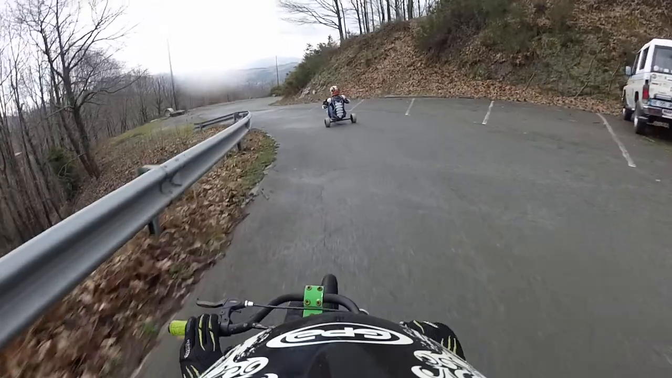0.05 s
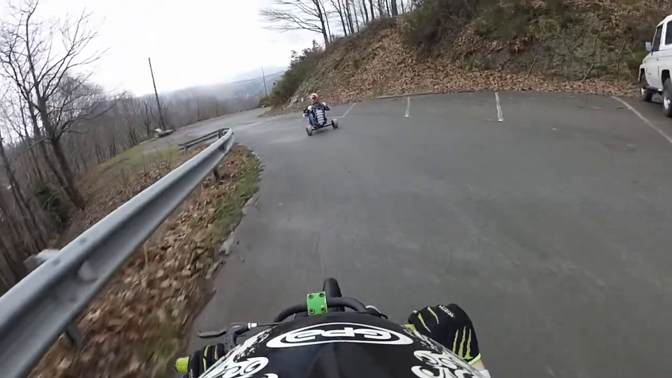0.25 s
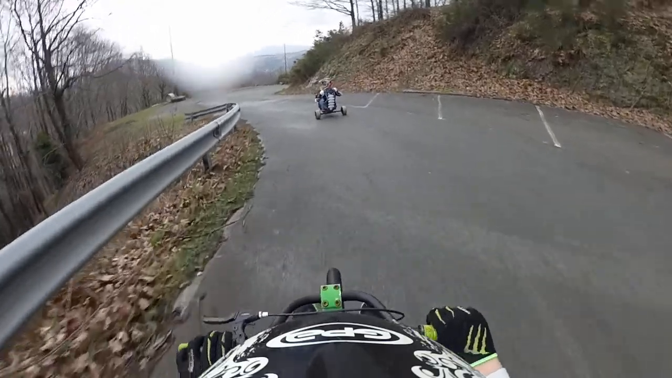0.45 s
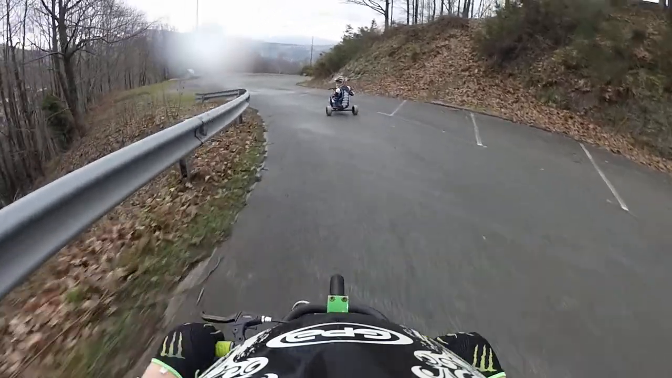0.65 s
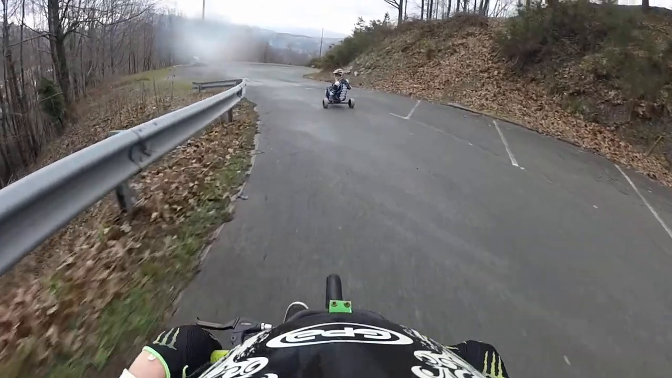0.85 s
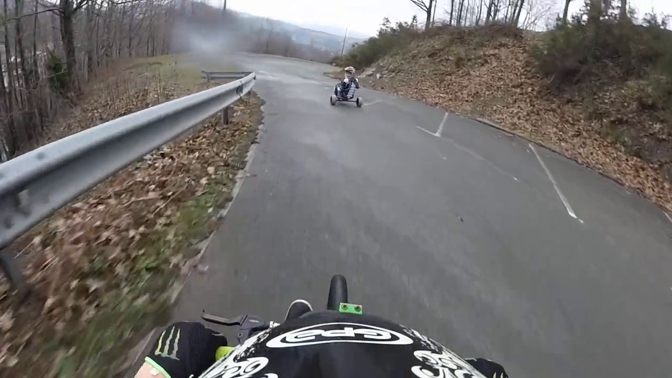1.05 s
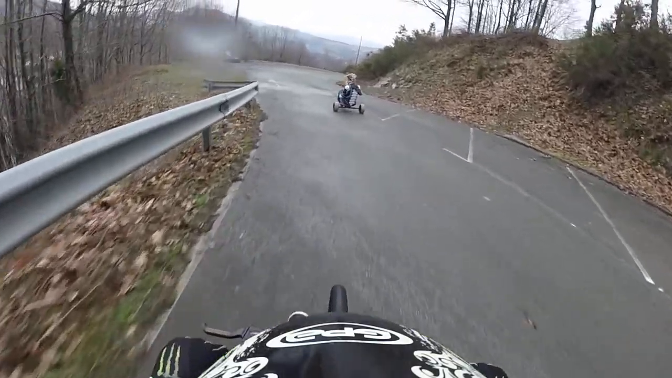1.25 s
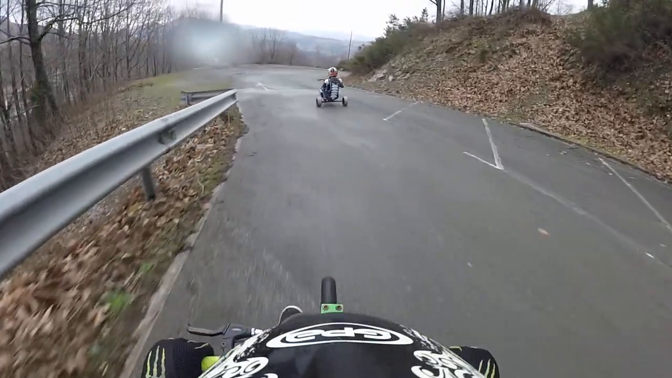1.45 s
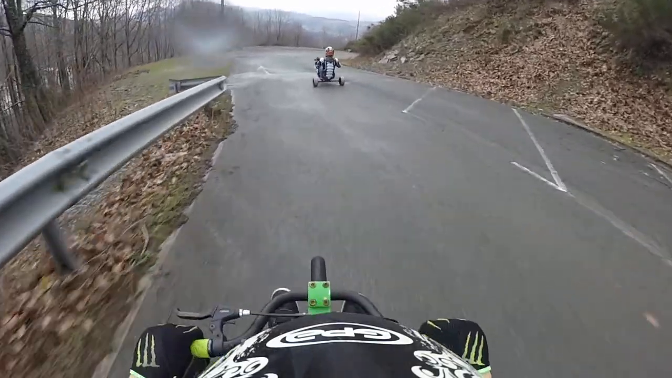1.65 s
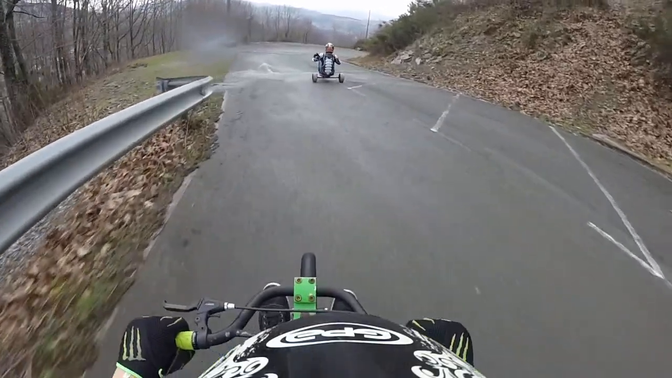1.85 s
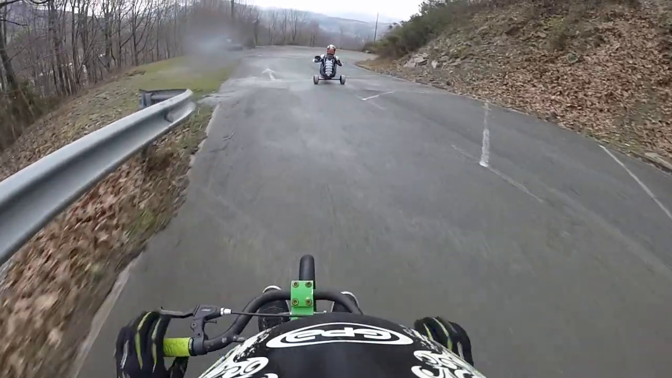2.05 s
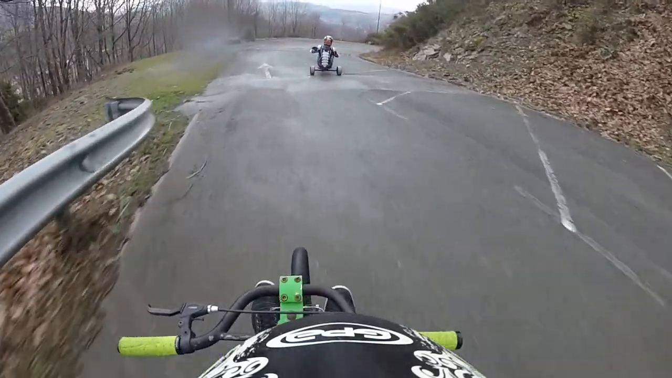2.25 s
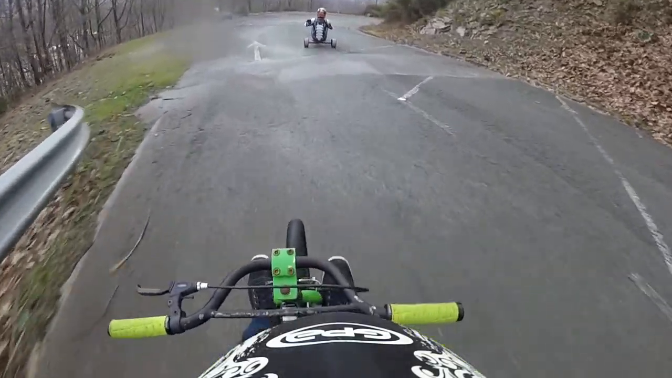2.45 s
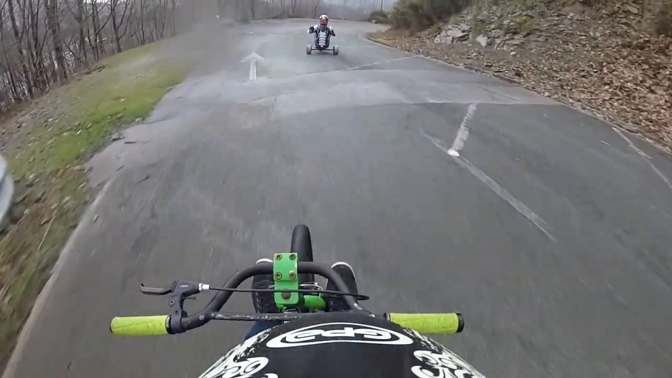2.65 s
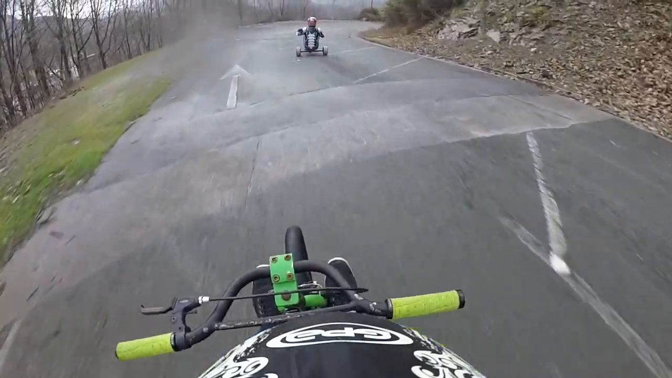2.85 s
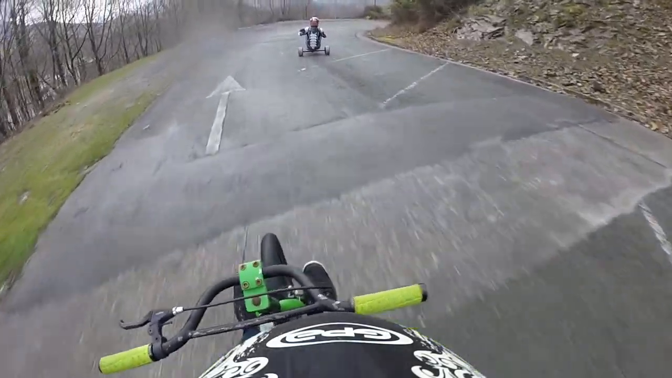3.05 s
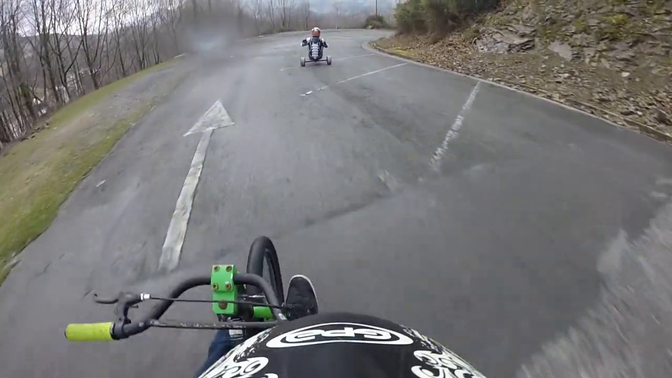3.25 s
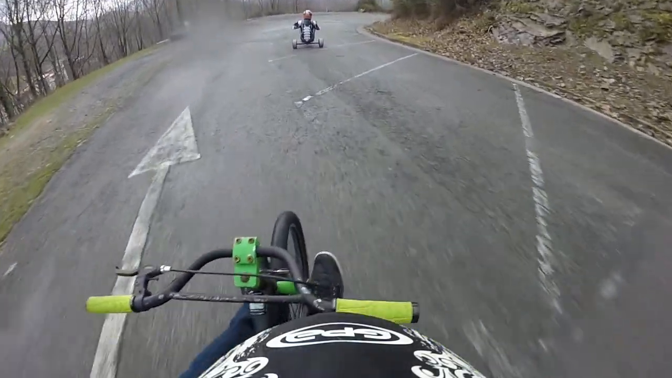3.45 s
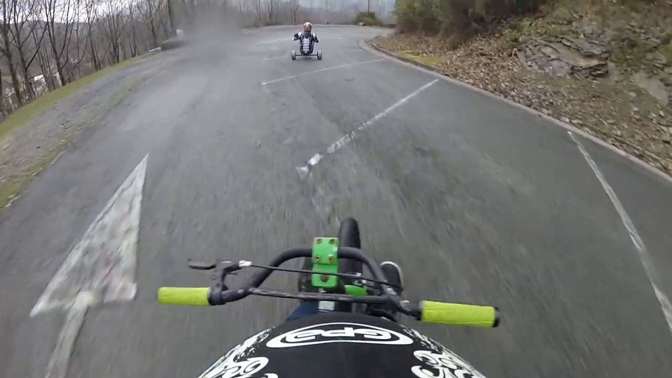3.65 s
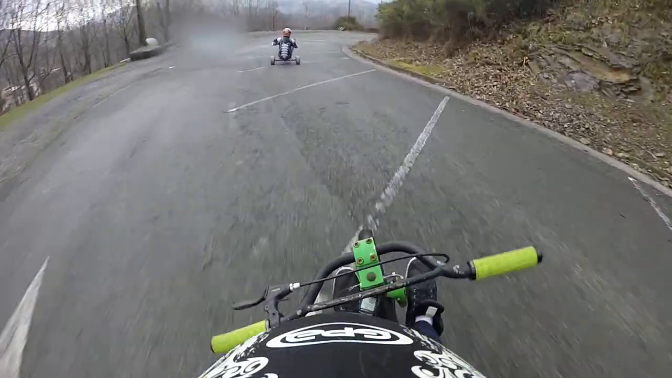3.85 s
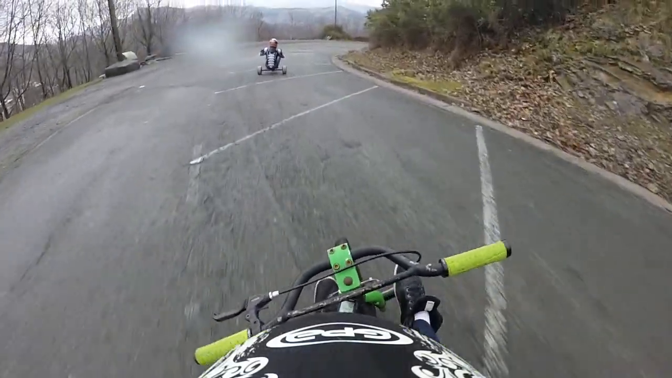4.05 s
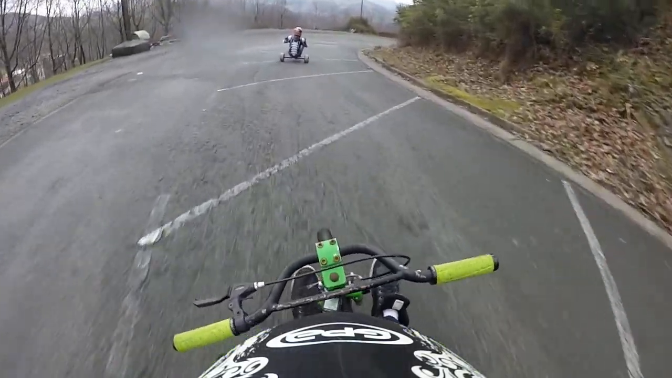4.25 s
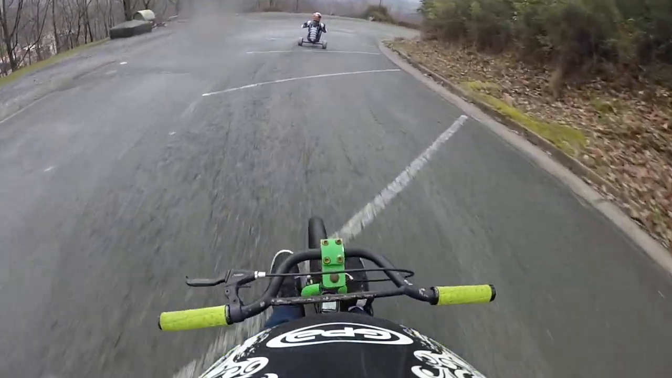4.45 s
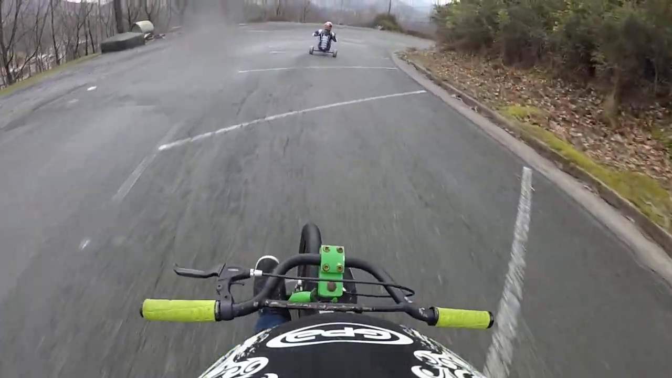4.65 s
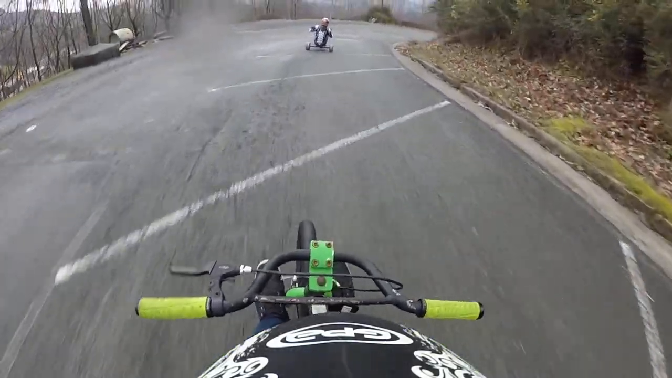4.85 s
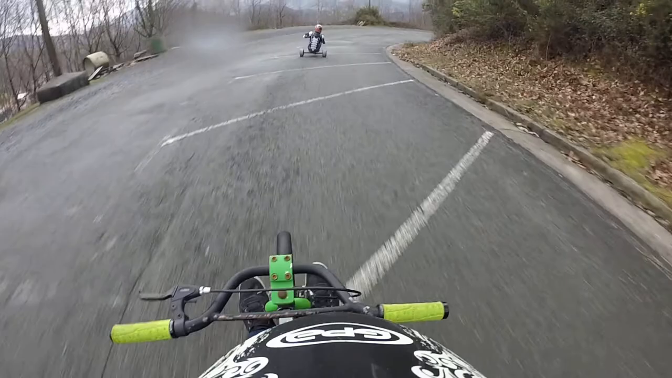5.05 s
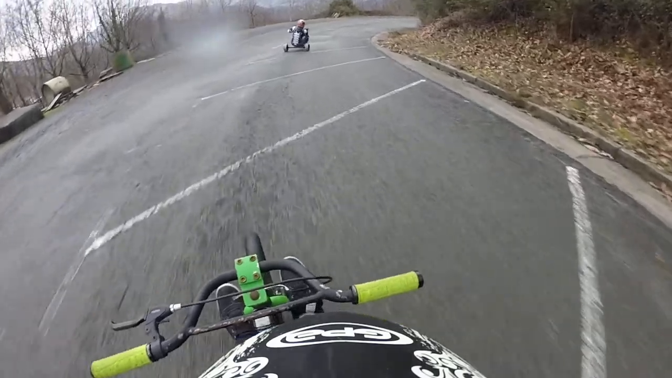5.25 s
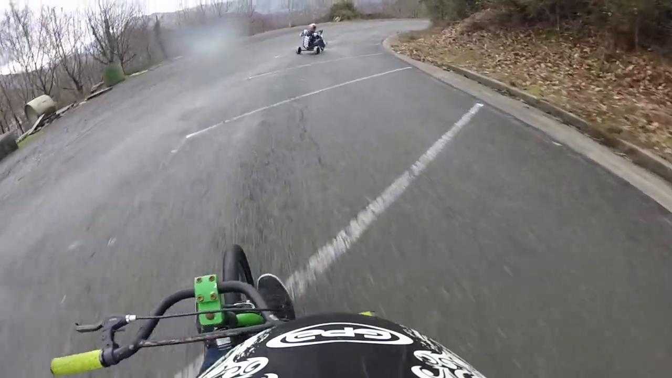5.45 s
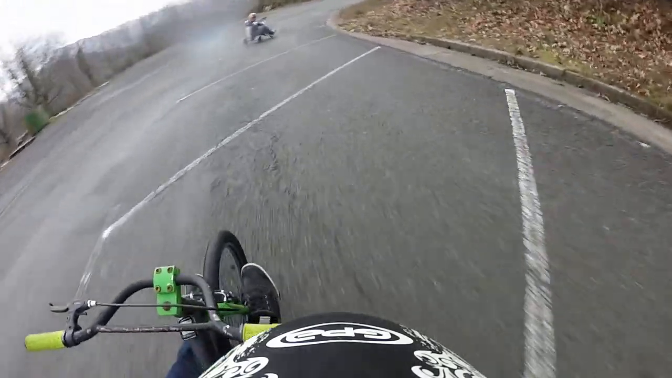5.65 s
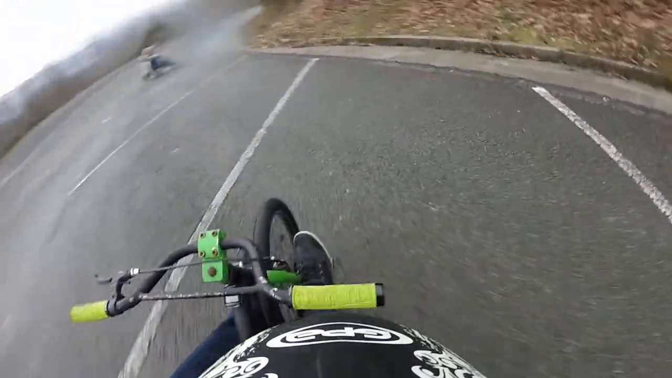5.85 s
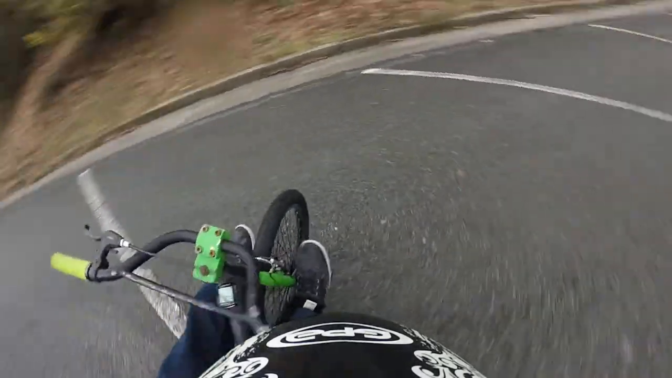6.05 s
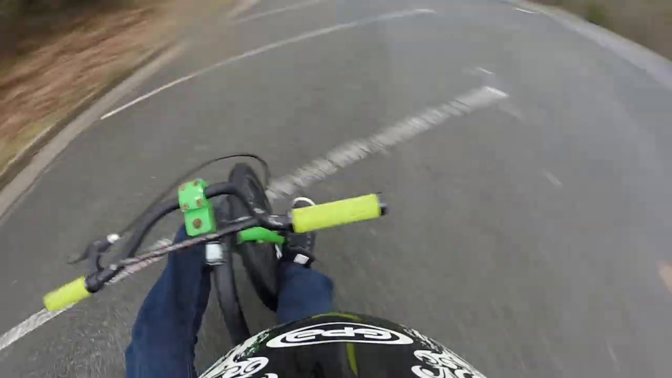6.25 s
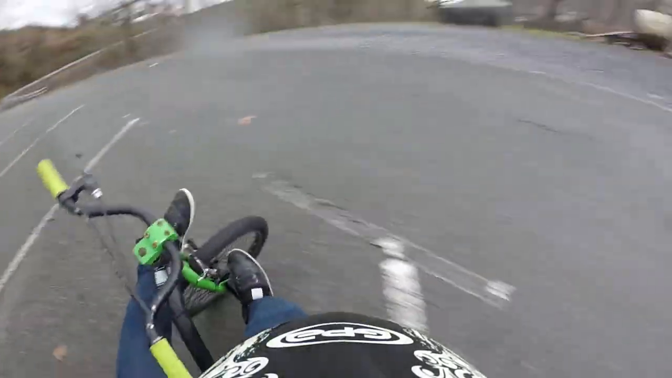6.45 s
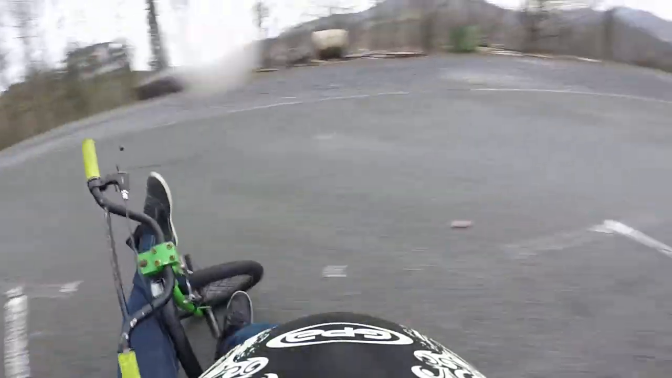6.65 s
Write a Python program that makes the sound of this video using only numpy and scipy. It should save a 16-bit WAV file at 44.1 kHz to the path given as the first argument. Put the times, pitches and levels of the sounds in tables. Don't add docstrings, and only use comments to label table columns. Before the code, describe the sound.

Close, enclosed, muffled-cased pickup on a rider's helmet: hard plastic grinding on asphalt, low drumming from the frame and soft wind buffeting. Small sharp ticks of grit and short ringing stone hits scatter throughout. A cluster of heavy thumps comes midway over rough road, and near the end the slide swells into a loud gritty scrape with sizzling dust and more thuds.

```python
import sys
import numpy as np
from scipy import signal
from scipy.fft import rfft, irfft, next_fast_len
from scipy.io import wavfile
from scipy.ndimage import uniform_filter1d, map_coordinates

SR = 44100
rng = np.random.default_rng(int(sys.argv[2]) if len(sys.argv) > 2 else 0)


def natural_amplitude(level_db):
    exponent = np.asarray(level_db, float) / 20
    return 10 ** exponent


def bounce(signal):
    frames = np.transpose(np.atleast_2d(signal))
    limited = np.clip(frames, -1, 1)
    pcm = np.round(limited * 32767).astype(np.int16)
    wavfile.write(sys.argv[1], SR, pcm)


N = 295470


def unit(x):
    return x / np.sqrt(np.mean(x ** 2) + 1e-20)


def curves(rows):
    s, *columns = np.transpose(rows)
    return [np.interp(np.arange(N) / SR, s, column) for column in columns]


def wobble(rate_hz):
    knots = rng.standard_normal(int(N * rate_hz / SR) + 4)
    return map_coordinates(knots, [np.arange(N) * rate_hz / SR])


def filtered(x, response):
    m = next_fast_len(N + SR // 2)
    return irfft(rfft(x, m) * response(np.fft.rfftfreq(m, 1 / SR)), m)[:N]


def coloured(x, points):
    last_hz, last_db = points[-1]
    f, db = np.transpose(points + [(2 * last_hz, last_db - 40)])
    return filtered(x, lambda hz: natural_amplitude(np.interp(np.log(hz + 1), np.log(f), db)))


def resonant(x, modes):
    def response(f):
        total = 0
        for k, (centre, width, db) in enumerate(modes):
            damping = 1j * f * width
            total = total + (-1) ** k * natural_amplitude(db) * damping / (centre * centre - f * f + damping)
        return total
    return filtered(x, response)


def grains(rate_hz, spread_db, smooth):
    struck = rng.random(N) < rate_hz / SR
    hardness_db = spread_db * np.minimum(rng.exponential(size=N), 3)
    size = natural_amplitude(hardness_db) * rng.standard_normal(N)
    return unit(struck * size) + smooth * rng.standard_normal(N)


def patchy(x, depth_db, bins, frames):
    z = signal.stft(x, nperseg=256)[2]
    field = uniform_filter1d(rng.standard_normal(z.shape), bins, 0)
    field = uniform_filter1d(field, frames, 1)
    return unit(signal.istft(z * natural_amplitude(depth_db * unit(field)), nperseg=256)[1][:N])


def bursts(s, ms, db):
    t = np.arange(SR // 20) / SR
    life = t / np.maximum(ms, 0.5)[:, None] * 1000
    rattle = natural_amplitude(-13 - 60 * t / 0.075)
    shape = (np.exp(-0.8 * life ** 2) + rattle) * (1 - np.exp(-t / 0.00024))
    at = np.round(s * SR).astype(int)[:, None] + np.arange(len(t))
    return np.bincount(at.ravel(), (natural_amplitude(db)[:, None] * shape).ravel(), N + SR)[:N]


def ringing(rows, rise_s, rough):
    out, t = np.zeros(N + SR), np.arange(SR // 4) / SR
    swell = (1 - np.exp(-t / rise_s)) ** 2
    for s, db, hz, t60_s in rows:
        decay = natural_amplitude(db - 60 * t / max(t60_s, 0.005))
        out[round(s * SR):][:len(t)] += decay * swell * np.sin(2 * np.pi * hz * t)
    return out[:N] * (1 + rough * wobble(1500))


# centre in Hz, width in Hz, level in dB.
CASE_MODES = [(1770, 163, -5), (2415, 197, -4.5), (3096, 260, -9.5), (3638, 288, -13), (4640, 756, -13),
              (6110, 777, -17.5), (7200, 286, -26.5), (10010, 880, -28.5), (11100, 4900, -36)]


def airborne(envelope, source, points):
    steady = np.std(resonant(coloured(source, points), CASE_MODES))
    return resonant(coloured(envelope * source, points), CASE_MODES) / steady


# time in seconds, load on the sleeves in dB, sideways scrape in dB.
ROLLING = [
    (0.0, -48, -68),
    (0.4, -47, -68),
    (0.97, -42, -69),
    (2.07, -41.5, -68),
    (2.22, -39.5, -67),
    (3.29, -39, -64.5),
    (4.03, -38, -60),
    (4.34, -36.5, -66),
    (4.95, -36, -63),
    (5.55, -38.5, -63),
]
# time in seconds, load on the sleeves in dB, sideways scrape in dB.
SLIDING = [
    (5.62, -36.5, -62.5),
    (5.85, -32.5, -56),
    (6.05, -29.5, -49),
    (6.146, -27.5, -43),
    (6.27, -32, -52),
    (6.386, -35.5, -58.5),
    (6.452, -35, -53),
    (6.7, -33, -50.5),
]
# frequency in Hz, level in dB per Hz.
DRONE_SPECTRUM = [(700, -6), (1250, -5), (1450, 3.5), (1660, 8.5), (1850, 5), (2000, -1), (2600, -34)]
# frequency in Hz, level in dB per Hz.
GRIND_SPECTRUM = [(1000, -42), (1900, -15), (2200, 0.5), (3300, -2), (4200, -7.5), (6000, -37)]
# frequency in Hz, level in dB per Hz.
HISS_SPECTRUM = [(2500, -14.5), (3600, -4), (4800, -3.5), (6300, -3.5), (6900, -18), (9000, -33)]
# frequency in Hz, level in dB per Hz.
FIZZ_SPECTRUM = [(6500, -24), (8000, 3.5), (9000, -1), (12000, -5), (14000, -12), (15300, -13)]


def wheels():
    drone_db, fizz_db = curves(ROLLING + SLIDING)
    load_db, scrape_db = drone_db + 38, fizz_db + 68
    grind_db = -43 + 0.43 * load_db + 0.4 * scrape_db
    hiss_db = -49.5 + 0.31 * load_db + 0.61 * scrape_db
    sliding = np.arange(N) / SR > SLIDING[0][0]
    lift_db = np.where(sliding, -0.5, 2.0)
    lumpy = np.where(sliding, 0.3, 1.0)
    flutter = lumpy * (wobble(12) + 0.4 * wobble(40))
    coarse = patchy(grains(4000, spread_db=1.5, smooth=1.0), depth_db=1.5, bins=3, frames=12)
    fine = patchy(grains(2500, spread_db=2.0, smooth=1.0), depth_db=2.5, bins=10, frames=5)
    drone_db = drone_db + lift_db + 0.3 * flutter + 0.38 * wobble(28)
    grind_db = grind_db + lift_db + 0.33 * flutter + 0.74 * wobble(30)
    hiss_db = hiss_db + lift_db - 4 + 0.38 * flutter + 0.22 * wobble(30)
    fizz_db = fizz_db + lift_db + 0.5 + 1.1 * flutter + lumpy * wobble(23)
    low = airborne(natural_amplitude(drone_db), coarse, DRONE_SPECTRUM) + airborne(natural_amplitude(grind_db), coarse, GRIND_SPECTRUM)
    high = airborne(natural_amplitude(hiss_db), fine, HISS_SPECTRUM) + airborne(natural_amplitude(fizz_db), fine, FIZZ_SPECTRUM)
    return low + high


# time in seconds, drumming in dB.
ROUGHNESS = [(0.0, -37.5), (0.49, -38.5), (1.1, -39), (1.46, -39.5), (2.4, -35.5), (3.0, -37), (3.49, -31),
             (3.75, -38), (4.25, -36), (4.64, -40.5), (5.9, -36), (6.2, -31.5), (6.7, -29.5)]
# frequency in Hz, level in dB per Hz.
FRAME_SPECTRUM = [(29, -33), (50, -6.5), (91, 1), (108, 0), (149, -5), (205, -21), (230, -27), (300, -27.5),
                  (510, -120)]
# centre in Hz, width in Hz, level in dB.
MOUNT_MODES = [(237.4, 17.2, 1.5), (339.4, 46, -1.5), (492, 223, -6.5), (714.5, 54, 1.5), (1050, 630, -9)]
# time in seconds, peak in dB.
MOUNT_JARS = [(3.248, -33), (3.299, -29), (3.332, -25), (3.363, -26), (3.391, -25), (3.433, -23.5),
              (3.534, -21), (3.555, -32), (3.589, -26), (4.27, -36), (4.306, -28), (4.336, -28),
              (4.52, -36), (4.57, -34), (5.7, -35), (5.829, -28), (5.88, -50), (6.13, -38), (6.451, -31),
              (6.49, -37), (6.68, -42)]
# time in seconds, peak in dB, frequency in Hz, t60 in seconds.
SEAMS = [(1.809, -19, 87, 0.086), (2.301, -25, 116, 0.12), (2.513, -16.5, 71, 0.096),
         (3.159, -21.5, 86, 0.12), (3.306, -16.5, 101, 0.082), (3.34, -18, 104, 0.058),
         (3.377, -21, 97.5, 0.062), (3.398, -9, 99, 0.042), (3.432, -11, 97, 0.057),
         (3.533, -14, 99, 0.081), (3.563, -20, 100, 0.072), (3.591, -22.5, 105.5, 0.15),
         (5.696, -18.5, 116, 0.094), (6.127, -18, 100, 0.11), (6.305, -27, 78.5, 0.058),
         (6.451, -7.5, 106, 0.095), (6.499, -15, 95, 0.064), (6.579, -21, 111, 0.086),
         (6.678, -6.5, 102, 0.033)]
# time in seconds, peak in dB, frequency in Hz.
SMALL_RIDGES = [(0.017, -26.5, 95), (0.255, -28, 105), (0.304, -32, 100), (0.407, -24, 103),
                (0.525, -29, 80.7), (0.587, -34, 113), (0.872, -29, 80.7), (1.188, -25.5, 95),
                (1.689, -26.5, 118), (2.059, -23, 70.0), (2.27, -26, 102), (2.324, -21.5, 133),
                (2.43, -25, 99), (2.692, -23, 113), (2.818, -26, 62.4), (2.859, -21.5, 101),
                (2.905, -24, 91.5), (2.947, -19, 93), (3.255, -18.5, 92), (3.823, -25, 91.5),
                (3.919, -24, 105), (3.994, -24, 97), (4.086, -28, 107), (4.278, -27, 117),
                (4.304, -25.5, 122), (4.339, -30, 118), (4.373, -23, 96.9), (4.521, -23.5, 77.6),
                (4.582, -26, 136), (4.692, -27, 94.2), (4.909, -24, 96.9), (5.084, -27, 88.8),
                (5.249, -23, 98), (5.405, -24, 88.8), (5.514, -42, 83.4), (5.62, -20, 83),
                (5.785, -19, 103), (5.83, -21, 119), (5.901, -32, 105), (6.034, -19, 104),
                (6.408, -16.5, 96), (6.605, -27, 83.4), (6.639, -25, 96.9)]


def frame():
    drum_db, = curves(ROUGHNESS)
    jolts_db = 2.6 * wobble(25)
    drum = unit(natural_amplitude(jolts_db) * coloured(rng.standard_normal(N), FRAME_SPECTRUM))
    jar_s, jar_db = np.transpose(MOUNT_JARS)
    thud = bursts(jar_s, np.full(len(jar_s), 30.0), jar_db - 19)
    shake_db = -54 + 0.9645 * np.arange(N) / SR + 0.074 * (drum_db + 38)
    shaking = natural_amplitude(shake_db + 2.5 + 0.37 * jolts_db)
    shaking = shaking + bursts(jar_s, np.full(len(jar_s), 16.0), jar_db - 17)
    road = coloured(grains(800, spread_db=-0.5, smooth=1.55), [(100, 0), (3000, 0)])
    shake = resonant(shaking * road, MOUNT_MODES) / np.std(resonant(road, MOUNT_MODES))
    ridges = [(s, db - 1.5, hz, 0.1) for s, db, hz in SMALL_RIDGES]
    thumps = natural_amplitude(5.5) * ringing(SEAMS + ridges, rise_s=0.0048, rough=0.012)
    return (natural_amplitude(drum_db + 1.52) + thud) * drum + shake - thumps


# time in seconds, level in dB.
HEAD_WIND = [
    (0.0, -57),
    (0.07, -42),
    (1.53, -45),
    (2.5, -36),
    (3.17, -44),
    (3.28, -38),
    (3.97, -50),
    (5.3, -40),
    (6.66, -28.5),
    (6.7, -36),
]
# frequency in Hz, level in dB per Hz.
GUST_SPECTRUM = [(10, -23), (25, 6), (45, -4.5), (60, 1), (90, -35), (150, -75)]


def wind():
    buffets = natural_amplitude(4.3 * wobble(4.11)) * coloured(rng.standard_normal(N), GUST_SPECTRUM)
    return natural_amplitude(curves(HEAD_WIND)[0]) * unit(buffets)


# time in seconds, level in dB.
DAMP_DUST = [(0.0, -66), (0.47, -63), (0.97, -58), (1.1, -61), (1.57, -58.5), (1.75, -61.5), (3.0, -65.5),
             (4.01, -53.5), (4.42, -66), (4.76, -61), (5.26, -71), (5.8, -58), (6.08, -46), (6.44, -50),
             (6.7, -41.5)]
# frequency in Hz, level in dB per Hz.
DUST_SPECTRUM = [(5800, -20), (6700, -6), (7600, -4), (8300, -26)]


def spray():
    level_db = curves(DAMP_DUST)[0] + 6 + 2.5 * wobble(30)
    return airborne(natural_amplitude(level_db), grains(2000, spread_db=4.0, smooth=0.87), DUST_SPECTRUM)


# time in seconds, crack in dB, bright edge over it in dB, length in ms.
GUARD_RAIL_TICKS = [(0.0514, -30, -39, 2.8), (0.062, -23.5, -36, 2.7), (0.2079, -38, -13, 3.5),
                    (0.384, -35, -19, 3.5), (0.5079, -28, -41, 2.2), (0.574, -33, -19, 3.2),
                    (0.639, -29, -27, 3.2), (0.6746, -32, -23, 3.5), (0.724, -29, -21, 3.9),
                    (0.766, -25, -22, 5.2), (0.8007, -27, -33, 3.1), (0.8154, -35, -27, 3.5),
                    (0.8317, -26, -23, 3.1), (0.872, -33, -24, 3.5), (0.8867, -34, -13, 3.1),
                    (0.9118, -35, -15, 4.5), (0.971, -30, -31, 2.9), (0.9946, -32, -27, 3.5),
                    (1.009, -26.5, -25, 2.7), (1.035, -31, -15, 3.9), (1.0894, -33.5, -16, 4.8),
                    (1.13, -33, -22, 2.9), (1.1524, -23, -19, 6), (1.255, -39, -13, 3.5),
                    (1.273, -32.5, -6.5, 2.9), (1.344, -27.5, -20, 2.6), (1.352, -33.5, -12, 3.5),
                    (1.5068, -31.5, -13, 6.2), (1.5224, -27, -25, 3.2), (1.538, -30, -16, 3.9)]
# time in seconds, crack in dB, bright edge over it in dB, length in ms.
PATCHED_ROAD_TICKS = [(1.562, -31.5, -19, 5.5), (1.677, -28.5, -23, 5), (2.098, -32, -20, 5.1),
                      (2.1311, -35, -20, 4.5), (2.182, -38, -29, 4.5), (2.2005, -28.5, -23, 10),
                      (2.2982, -35, -12, 5), (2.322, -33, -20, 5.4), (2.352, -33.5, -17, 5.9),
                      (2.4466, -28, -19, 3.1), (2.5995, -39, -6, 4.5), (2.6673, -29.5, -12, 3.4),
                      (2.7182, -36, -20, 4.5), (2.7901, -35, -24, 4.5), (2.8544, -26, -18, 4),
                      (2.8664, -27.5, -18, 3.7), (2.9476, -29, -16, 5.4), (2.9926, -37, -18, 4.5),
                      (3.0126, -33, -23, 4.5), (3.029, -29, -17, 4.5), (3.1172, -17.5, -26, 4.5),
                      (3.247, -30, -36, 4.5), (3.3314, -24.5, -20, 5.2), (3.3483, -28, -27, 4.5),
                      (3.403, -37, -12, 4.5), (3.4905, -28, -28, 3.6), (3.7456, -33, -29, 7.2),
                      (3.761, -26.5, -20, 3.6), (3.9855, -36, -6, 4.5), (4.015, -31, -18, 4.5)]
# time in seconds, crack in dB, bright edge over it in dB, length in ms.
TURN_IN_TICKS = [(4.1096, -31.5, -11, 2.9), (4.2193, -27.5, -30, 3.9), (4.2516, -32, -23, 3.8),
                 (4.2946, -30, -25, 3.5), (4.4762, -40, -25, 3.5), (4.513, -25, -30, 3.5),
                 (4.5244, -28.5, -17, 3.5), (4.568, -27, -25, 3.5), (4.675, -25.5, -23, 5),
                 (4.697, -29, -13.5, 3.1), (4.7024, -39, -22, 3.5), (5.0025, -31, -28, 3.5),
                 (5.1884, -32, -22, 3.5), (5.196, -27.5, -14, 4.7), (5.2462, -24, -19, 4),
                 (5.2664, -36, -18, 3.5), (5.2849, -32, -17, 3.5), (5.3497, -36, -20, 3.5),
                 (5.403, -33, -12, 3.5), (5.4206, -32, -32, 3.5), (5.5313, -50, -20, 2.8),
                 (5.5972, -40, -22, 3.5), (5.6085, -25, -31, 2.7), (5.6687, -37.5, -7, 3.9),
                 (5.8341, -26, -26, 3.4), (5.9179, -27, -19, 3.5), (6.0312, -25.5, -15, 3.5),
                 (6.14, -14.5, -30, 2.4), (6.4736, -19, -35, 6.6), (6.6245, -22, -23, 4.7)]
# time in seconds, peak in dB, bright edge over it in dB.
FINE_SPECKS = [(0.2428, -39, -22), (0.254, -35, -28), (0.3306, -40, -20), (0.4434, -47, -22),
               (0.5556, -38, -18), (0.9686, -31, -22), (1.069, -31, -18), (1.1844, -36, -20),
               (1.3039, -38, -20), (1.3144, -34, -20), (1.4804, -40, -20), (1.5914, -33, -16),
               (1.6107, -33, -17), (1.731, -28, -26), (1.7639, -37, -14), (1.8342, -44, -20),
               (1.9924, -41, -14), (2.1311, -35, -20), (2.1714, -31, -22), (2.4814, -35, -19),
               (2.54, -31, -20), (2.6484, -40, -15), (2.7084, -32, -20), (3.0754, -35, -20),
               (3.1025, -31, -16), (3.3977, -23, -24), (3.5304, -28, -20), (3.787, -29, -20),
               (4.3444, -36, -20), (4.4264, -40, -24), (4.8105, -33, -24), (4.8299, -35, -29),
               (4.896, -30, -30), (4.9614, -45, -18), (5.0579, -31, -25), (5.232, -25, -24),
               (5.7004, -38, -18), (5.7354, -42, -20), (5.8163, -28, -22), (5.944, -34, -20),
               (6.018, -22, -22), (6.0621, -26, -20), (6.0744, -22, -24), (6.1777, -18, -24),
               (6.2294, -24, -18), (6.4023, -21, -27), (6.4564, -24, -20), (6.4894, -32, -20),
               (6.5154, -29, -20), (6.602, -24, -20), (6.682, -26, -20)]
# time in seconds, level in dB.
LOOSE_SCUFFS = [(0.029, -36), (0.1057, -33), (0.169, -38), (0.3446, -38), (0.3934, -34), (0.5636, -33),
                (0.8574, -35), (1.2824, -45), (1.6477, -31), (2.0118, -40), (2.0582, -33), (2.2493, -32),
                (2.8314, -33), (3.2286, -36), (3.2889, -33), (3.4444, -30), (3.5524, -29), (5.1682, -42),
                (4.9614, -46), (5.7004, -37), (6.062, -26), (6.078, -29), (6.485, -25)]
# time in seconds, level in dB.
PART_KNOCKS = [(0.0623, -29), (0.1064, -22), (0.2067, -27), (0.3446, -23), (0.7667, -45), (1.1528, -34),
               (1.5083, -26), (1.538, -22.5), (1.5595, -25), (1.651, -21), (2.3008, -22), (2.6678, -26),
               (2.8667, -20.5), (2.9482, -25), (3.0275, -33), (3.119, -13.5), (3.248, -21), (3.3329, -16),
               (3.4035, -20.5), (3.7604, -28), (3.985, -24), (4.296, -23), (4.5247, -28), (4.5677, -22),
               (5.1958, -20.5), (5.248, -19.5), (5.598, -19), (5.8348, -15.5), (6.1384, -26), (6.4732, -39)]
# frequency in Hz, level in dB per Hz.
KNOCK_SPECTRUM = [(900, -16), (1700, -7), (2200, -2), (3000, -1), (4200, -10.5), (7000, -20)]
# frequency in Hz, level in dB per Hz.
CRACK_SPECTRUM = [(1800, -31), (3000, 3), (5000, 4), (7500, 8.5), (9000, 4), (13000, -38)]
# frequency in Hz, level in dB per Hz.
EDGE_SPECTRUM = [(5000, -23.5), (7500, 8), (9000, 3), (12000, 2), (15000, -10)]


def grit():
    specks = [(s, db + 0.5, edge_db, 1.53) for s, db, edge_db in FINE_SPECKS]
    ticks = GUARD_RAIL_TICKS + PATCHED_ROAD_TICKS + TURN_IN_TICKS + specks
    s, crack_db, edge_db, ms = np.transpose(ticks)
    crack_db = crack_db - 9.5
    scuff_s, scuff_db = np.transpose(LOOSE_SCUFFS)
    scuffs = bursts(scuff_s, np.full(len(scuff_s), 8.5), scuff_db - 13)
    knock_s, knock_db = np.transpose(PART_KNOCKS)
    knocks = bursts(knock_s, np.full(len(knock_s), 3.1), knock_db - 9)
    knocks = knocks + bursts(s, ms, crack_db - 1)

    when, size, tone, length = rng.random((420, 4)).T
    patter_s, patter_ms = when * N / SR, 1.1 + 6 * length ** 3
    patter_db = -0.5 - 3.3 * np.log(size + 0.05)
    cracks = bursts(s, ms, crack_db) + scuffs + bursts(patter_s, patter_ms, patter_db - 59 + 8 * tone)
    edges = bursts(s, ms, crack_db + edge_db + 9.5) + natural_amplitude(-11.5) * scuffs
    edges = edges + bursts(patter_s, patter_ms, patter_db - 68 - 8 * tone)
    snaps = np.bincount(np.round(s * SR).astype(int) + 12, natural_amplitude(crack_db + 5), N)

    noises = rng.standard_normal((3, N))
    dull, mid, bright = [patchy(noise, depth_db=1.5, bins=7, frames=4) for noise in noises]
    out = airborne(knocks, dull, KNOCK_SPECTRUM)
    out += airborne(cracks, mid, CRACK_SPECTRUM)
    out += airborne(snaps, np.sign(rng.standard_normal(N)), CRACK_SPECTRUM)
    return out + airborne(edges, bright, EDGE_SPECTRUM)


# time in seconds, peak in dB, frequency in Hz, t60 in seconds.
STONE_HITS = [(0.346, -20, 1780, 0.017), (0.508, -24, 1780, 0.0069), (0.766, -23, 1780, 0.013),
              (0.106, -29, 1790, 0.015), (1.785, -26, 1770, 0.018), (1.1528, -14.5, 1780, 0.021),
              (1.6516, -21, 1770, 0.025), (2.3002, -21, 1770, 0.044), (2.948, -21, 1780, 0.013),
              (3.249, -29, 1820, 0.017), (4.513, -27, 1780, 0.016), (5.247, -19, 1780, 0.013),
              (3.1187, -17, 1710, 0.015), (3.5334, -13, 1840, 0.026), (3.552, -22, 1720, 0.027),
              (4.4363, -34, 1790, 0.04), (5.1102, -35, 1730, 0.02), (5.8356, -15.5, 1770, 0.04),
              (6.0614, -20, 1760, 0.021), (6.129, -15, 1760, 0.018), (6.5957, -29, 1740, 0.025),
              (6.6855, -16, 1760, 0.0093)]


def stones():
    return natural_amplitude(4) * ringing(STONE_HITS, rise_s=0.00086, rough=0.066)


# frequency in Hz, level in dB per Hz.
JUDDER_SPECTRUM = [(1900, -32), (2300, 1), (3000, 5), (3500, -26), (5000, -3), (7000, -23)]


def judder():
    start_s, rise_s, hold_s, fall_s = 5.84, 0.13, 0.3, 0.057
    corners_s = start_s + np.cumsum([0, rise_s, hold_s, fall_s])
    swell = np.interp(np.arange(N) / SR, corners_s, [0, 1, 1, 0])
    envelope = swell * natural_amplitude(-33 + 3 * wobble(70))
    return airborne(envelope, grains(1500, spread_db=8.0, smooth=1.7), JUDDER_SPECTRUM)


def scene():
    return (wheels() + frame() + wind() + spray() + grit() + stones() + judder())[None]


def band_limit(x):
    return signal.sosfilt(signal.butter(12, 15700, fs=SR, output="sos"), x)


def record(dry):
    top_hz = 15330
    mix = filtered(dry[0], lambda hz: hz < top_hz)[None]
    return band_limit(mix)


dry = scene()
out = record(dry)
bounce(out)
```